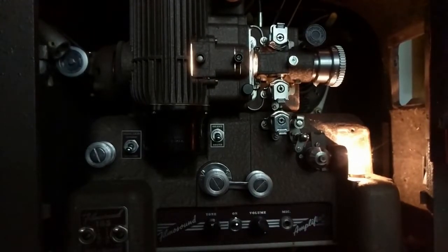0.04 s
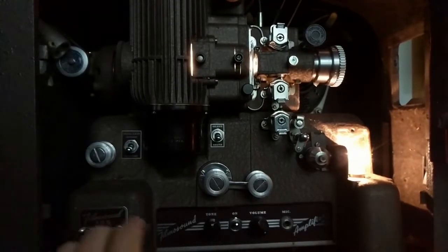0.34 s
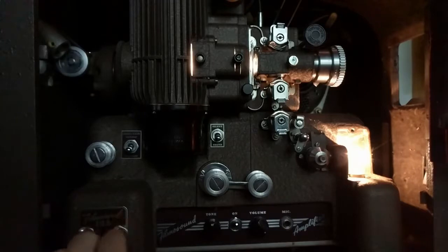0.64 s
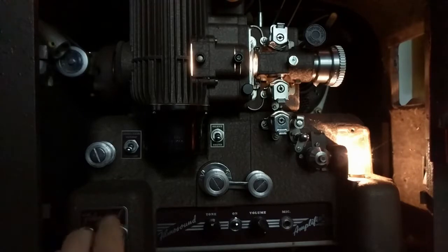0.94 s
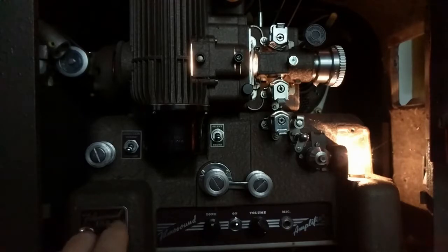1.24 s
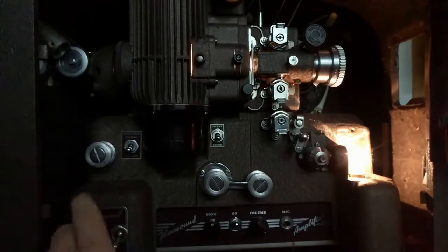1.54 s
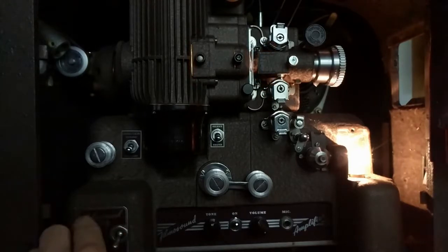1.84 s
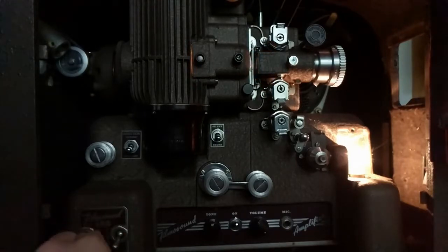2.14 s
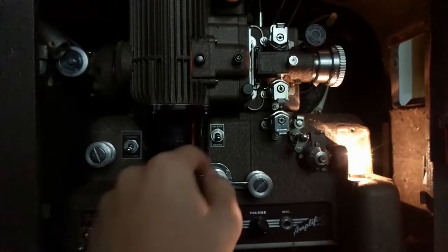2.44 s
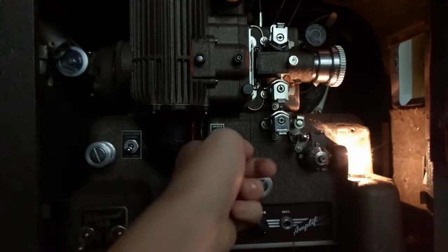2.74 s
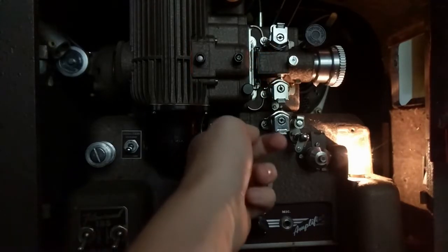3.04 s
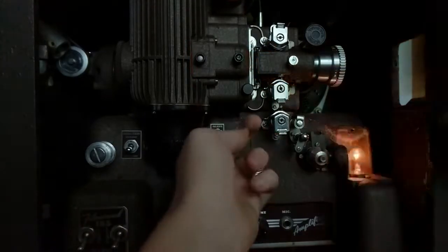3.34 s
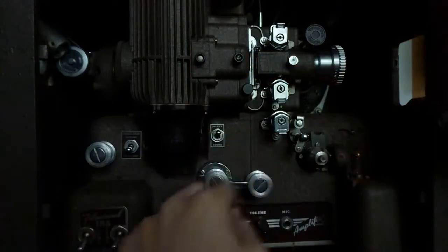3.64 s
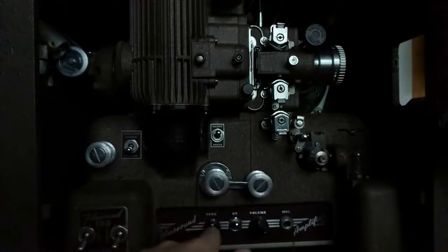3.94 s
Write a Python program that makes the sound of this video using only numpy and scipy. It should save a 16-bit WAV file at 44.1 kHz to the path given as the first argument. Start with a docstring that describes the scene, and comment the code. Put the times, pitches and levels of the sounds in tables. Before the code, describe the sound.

Close up, a film projector whirs and ticks steadily until a loud toggle click sends it coasting to rest. Another switch clicks during the slowdown, then come faint taps, a last click and a soft hand brush in a quiet room.

```python
"""Film projector switching off

A projector runs close by in a quiet room: fan air, whirring gears, motor tones, a ticking film drive.
A toggle snaps and friction brings the mechanism to rest. A second toggle snaps as it coasts; then come
light finger taps, a third toggle and a hand brushing the case. Mains hum remains.
A limiter ducks the mix after each snap."""
import sys
import numpy as np
from scipy import signal
from scipy.fft import rfft, irfft, next_fast_len
from scipy.io import wavfile
from scipy.ndimage import uniform_filter1d, map_coordinates

SR = 44100
rng = np.random.default_rng(int(sys.argv[2]) if len(sys.argv) > 2 else 0)


def unload_audio(sound):
    """Save the sound as a 16-bit wav file, at the path given as the first command line argument."""
    columns = np.transpose(np.atleast_2d(sound))
    # keep every value between -1 and 1, then stretch to whole-number steps
    steps = np.round(np.clip(columns, -1, 1) * 32767)
    wavfile.write(sys.argv[1], SR, steps.astype(np.int16))


N = 176400

COAST_S, STOP_S = 1.433, 2.42
FRAME_HZ, MOTOR_HZ, MAINS_HZ = 22.95, 83.6, 60
TICKS_PER_FRAME = 6

# Room tone: freq_hz, level_db
ROOM_COLOUR = [(25, -22.5), (55, -9.5), (95, 0), (150, -11), (230, -8), (320, -12.5), (550, -14),
               (950, -22), (1400, -15), (2300, -23.5), (3300, -26.5), (11000, -41.5), (15500, -39.5)]
# Mains harmonics, from the fundamental up: level_db
MAINS_LEVELS = [-71.5, -64, -64.5, -73]

# Finger taps on the lever: start_s, level_db, t60_s
FINGER_TAPS = [(2.949, -46.5, 0.08), (2.971, -52, 0.037), (3.005, -48, 0.032), (3.504, -51, .04)]
# Tone of a tap: freq_hz, level_db
TAP_COLOUR = [(200, 3), (800, 0), (2500, 6), (4500, 6), (7000, -8), (16000, -25)]
# Hand strokes on the case: centre_s, half_length_s, level_db
BRUSH_STROKES = [(3.652, 0.037, -47.5), (3.799, .015, -65.5), (3.89, 0.03, -66.5)]
# Skin friction: freq_hz, level_db
BRUSH_COLOUR = [(300, -12.5), (1100, -6), (2200, -12), (3200, -1), (5600, 0), (8000, -9.5), (16000, -18)]
# Resonances under the hand: freq_hz, width_hz, lift_db
BRUSH_PEAKS = [(1090, 80, 12), (1520, 150, 14), (4000, 350, 8.5), (11200, 700, 8), (13700, 620, 6)]

# Swells of the panel drone: centre_s, half_length_s, level_db
DRONE_SWELLS = [(.27, 0.044, -40.5), (.41, 0.038, -43), (.69, 0.0096, -38), (1.04, 0.033, -42),
                (1.17, 0.029, -38.5), (1.995, 0.062, -45), (2.34, 0.049, -49.5)]
# Film drive tones: multiple of the frame rate
DRIVE_MULTIPLES = (3, 8, 57, 63)
# Their strengths: level_db
DRIVE_LEVELS = [-52, -68, -39.5, -43.5]
# Motor tones: multiple of the shaft rate
MOTOR_MULTIPLES = (1, 4, 5, 13, 20, 26)
# Their strengths: level_db
MOTOR_LEVELS = [-47.5, -53.5, -54, -52.5, -63, -62.5]

# Fan air: freq_hz, level_db
AIR_COLOUR = [(100, -36), (300, -13), (600, -2.5), (1000, -2.5), (1500, 0), (2300, -8), (4000, -8),
              (5700, -8.5), (6800, -15), (9500, -16.5), (12000, -11), (14000, -19.5), (16000, -22)]
# Fan housing resonances: freq_hz, width_hz, lift_db
HOUSING_PEAKS = [(1560, 130, -2.5), (1730, 85, 7), (1934, 55, 12), (2017, 35, 9), (2825, 90, 8.5),
                 (2980, 42, 6.5), (3400, 110, 8), (3927, 190, 6.5), (4320, 110, 5.5), (5060, 340, 7),
                 (5560, 217.5, 7.5)]
# Gear whir: freq_hz, level_db
GEAR_COLOUR = [(40, -32), (110, -15.5), (165, -21), (240, -8), (440, -7.5), (560, 0.5), (700, -4),
               (870, -9.5), (1100, 1.5), (1400, -4), (1600, -15), (3000, -10.5), (7000, -23.5),
               (16000, -29)]
# Resonances of the casting: freq_hz, width_hz, lift_db
CASTING_PEAKS = [(347, 19, 7.1), (760.7, 67, 15.3), (1360, 70, 3.5), (2590, 160, 8.3), (3420, 75, 6),
                 (5100, 170, 10)]
# Envelope of a gear resonance that sings as the drive slows: time_s, level_db
SING_ENVELOPE = [(1.36, -40.5), (1.55, -38), (1.72, -32.5), (1.86, -33.5), (1.98, -34.5), (2.06, -40.5),
                 (2.241, -48), (2.4, -99)]
# Last shudders before standstill: centre_s, half_length_s, level_db
SHUDDER_SWELLS = [(2.302, 0.011, -49.5), (2.329, 0.012, -49.5), (2.378, 0.029, -55)]
# Tone of a shudder: freq_hz, level_db
SHUDDER_COLOUR = [(100, -28), (250, 10.5), (700, 6), (1200, -9), (8000, -7.5), (16000, -23)]
# Click of a tick: freq_hz, level_db
TICK_COLOUR = [(1000, -23), (3000, 5), (5300, -14.5), (7000, -5), (9500, -9.5), (11000, 8.5), (12000, 1.5),
               (13200, -9.5), (16000, -17.5)]
# Ring of a tick: pitch_hz, level_db, t60_s
TICK_RING = [(5276, -7.5, 0.029), (10500, -10.5, 0.005), (11560, -5.5, .007), (11900, -6.5, 0.014),
             (12420, -6, .005)]

# Toggle snaps: start_s, crack_db, hold_s, ring_db, clatter_db, body_db, sizzle_db, thump_db,
# lever_db (relative to the crack)
TOGGLE_SNAPS = [(1.3599, -0.5, 0.0055, -27, -18, -4, -23, -47, -45),
                (2.124, 1, 0.003, -20, -23, -7.5, -25.5, -31, -32.5),
                (3.37, -3.5, 0.001, -31, -33, -24.5, -33.5, -69, -36)]
# Crack of the first, second and third toggles: freq_hz, level_db
FIRST_CRACK = [(150, -28), (550, -8), (1050, 1), (1870, -4), (2500, 3), (3280, -6), (4100, 0), (5400, -6),
               (6300, -1), (7000, -13), (15500, -15)]
SECOND_CRACK = [(88, -47), (280, -29), (600, -12.5), (2410, -7), (3410, -10), (3980, 7.5), (4500, -4),
                (5760, -9), (7000, -16.5), (7560, -3.5), (8330, -18), (12300, -8), (13500, -12),
                (15500, -30.5)]
THIRD_CRACK = [(150, -26), (700, -13), (1300, -12.5), (2000, 0.5), (2900, -6.5), (3700, -1.5), (4480, -14),
               (5500, -6.5), (9200, -5.5), (10200, -18), (13000, -7), (16000, -6)]
# Modes of the panels that carry the toggles: pitch_hz, level_db, t60_s
BASE_MODES = [(390, -5, .1), (473, -2.5, 0.15), (647, -2, 0.18), (1049.5, 0.5, 0.1), (1301, 1, .2),
              (1580, -4.5, .07), (1860, 0.5, .17), (2433, -1, 0.13), (2850, -5, .18), (3090, -9, .2),
              (3397, -4.5, .22), (4025, -10.5, .22)]
UPPER_MODES = [(734, 2.5, 0.09), (1330, -1.5, 0.1), (1810, -0.5, 0.13), (3260, -10.5, 0.26),
               (4200, -8, 0.2), (5730, -8, 0.21), (9300, -5, .2)]
# Body knock, diffuse clatter and spring sizzle of a snap: freq_hz, level_db
BODY_COLOUR = [(40, -25), (150, -14), (400, -11.5), (700, 3.5), (3000, 3.5), (5000, -20), (12000, -35.5)]
CLATTER_COLOUR = [(100, -7), (600, -1), (1500, -9), (3800, 1.5), (6000, -3), (9000, -7.5), (16000, -13)]
SPRING_COLOUR = [(3000, -25.5), (7000, -1.5), (11000, -5.5), (14000, -3.5), (16000, -13)]


def amp(db):
    """Decibels to gain."""
    return 10 ** (np.asarray(db) / 20)


def unit(x):
    """Scale to rms 1."""
    return x / np.sqrt(np.mean(x ** 2) + 1e-20)


def clock():
    """Time of each sample in seconds."""
    return np.arange(N) / SR


def wobble(rate_hz):
    """A smooth random curve with rate_hz knots a second."""
    return map_coordinates(rng.standard_normal(int(N * rate_hz / SR) + 4), [clock() * rate_hz])


def shaped_noise(response):
    """Noise of rms 1 through a gain curve over frequency."""
    size = next_fast_len(N + 8192)
    spectrum = rfft(rng.standard_normal(N), size) * response(np.fft.rfftfreq(size, 1 / SR))
    return unit(irfft(spectrum, size)[:N])


def noise(colour, peaks=()):
    """Noise of rms 1 with a broad colour and resonances on top."""
    freqs, levels = np.transpose(colour)

    def response(hz):
        broad_db = np.interp(np.log(hz + 1), np.log(freqs + 1), levels)
        lift_db = sum(db / (1 + (2 * (hz - centre) / width) ** 2) for centre, width, db in peaks)
        return amp(broad_db + lift_db)
    return shaped_noise(response)


def narrow(centre_hz, width_hz):
    """Noise of rms 1 in a single resonance."""
    return shaped_noise(lambda hz: 1 / (1 + (2 * (hz - centre_hz) / width_hz) ** 4))


def strike(start_s, t60_s, hold_s=0):
    """Sudden attack, hold, exponential release."""
    age = clock() - start_s
    return (age >= 0) * amp(-60 * np.maximum(age - hold_s, 0) / t60_s)


def swells(rows):
    """Sum of bell-shaped swells."""
    return sum(amp(db) * np.exp(-((clock() - centre) / half) ** 2) for centre, half, db in rows)


def sine(cycles):
    """A tone of rms 1 with a random starting phase."""
    return np.sqrt(2) * np.sin(2 * np.pi * (cycles + rng.random()))


def room():
    """The bed: room rumble and hiss, mains hum and a faint, steady, very high narrow hiss."""
    hum = sum(amp(db) * sine(k * MAINS_HZ * clock()) for k, db in enumerate(MAINS_LEVELS, 1))
    return amp(-61) * noise(ROOM_COLOUR) + hum + amp(-91.5) * narrow(14460, width_hz=160)


def hand(grain_db=2, touch_s=0.038):
    """Light finger taps, and grainy brushes that start as the skin lands, touch_s before mid-stroke."""
    taps = sum(amp(db) * strike(start, t60) for start, db, t60 in FINGER_TAPS) * noise(TAP_COLOUR)
    strokes = sum(swells([row]) * (clock() > row[0] - touch_s) for row in BRUSH_STROKES)
    return taps + strokes * amp(grain_db * wobble(310)) * noise(BRUSH_COLOUR, BRUSH_PEAKS)


def panel_drone(speed, pitch_hz=215.8, drift_hz=5):
    """A case panel drones in uneven swells over a low murmur that fades with the speed."""
    phase = 2 * np.pi * np.cumsum(pitch_hz + drift_hz * wobble(25.33)) / SR
    murmur = amp(-52) * speed * narrow(pitch_hz, width_hz=39)
    return swells(DRONE_SWELLS) * np.sqrt(2) * np.sin(phase) + murmur


def shaft_tones(speed, flutter=.0012, waver_db=2, case_hz=134, case_width_hz=24, case_lift_db=16):
    """Drive and motor tones glide down with the speed; the falling hum sweeps a case resonance."""
    travel_s = np.cumsum(speed * (1 + flutter * wobble(14))) / SR
    partials = [(k * FRAME_HZ, db) for k, db in zip(DRIVE_MULTIPLES, DRIVE_LEVELS)]
    partials += [(k * MOTOR_HZ, db) for k, db in zip(MOTOR_MULTIPLES, MOTOR_LEVELS)]
    out = np.zeros(N)
    for hz, db in partials:
        if hz < 10 * FRAME_HZ:  # hum lasts until it sinks too low to radiate
            pitch_hz = hz * speed
            radiation = 1 / (1 + (58 / (pitch_hz + 1)) ** 20)
            resonance = np.exp(-(2 * (pitch_hz - case_hz) / case_width_hz) ** 2 / 2)
            gain = speed ** .3 * radiation * amp(case_lift_db * resonance)
        else:  # whines fade fast once the load is off
            gain = speed ** 5 * amp(waver_db * wobble(16))
        out += amp(db) * gain * sine(hz * travel_s)
    return out


def fan(speed):
    """Air rushes through the resonant housing and dies away as the fan slows."""
    return amp(-30) * speed ** 1.78 * noise(AIR_COLOUR, HOUSING_PEAKS)


def gears(speed, pulse_depth=0.033, rough_db=1.5):
    """Gears whir in the casting, pulsing with the frames; they sing as they slow and shudder to rest."""
    frames = np.cumsum(speed) / SR * FRAME_HZ
    pulse = 1 + pulse_depth * np.cos(2 * np.pi * frames)
    whir = amp(-31.5 + rough_db * wobble(70)) * speed ** 0.93 * pulse * noise(GEAR_COLOUR, CASTING_PEAKS)
    sing_db = np.interp(clock(), *np.transpose(SING_ENVELOPE), left=-120, right=-120)
    sing = amp(sing_db) * narrow(1340, width_hz=190)
    return whir + sing + swells(SHUDDER_SWELLS) * noise(SHUDDER_COLOUR)


def film_ticks(speed, claw_db=7, backlash_db=3, tint_db=2.5, quiet_speed=0.31):
    """Six uneven ticks a frame, the first accented; they spread and wander as the teeth run slack."""
    count = np.floor(np.cumsum(speed) / SR * FRAME_HZ * TICKS_PER_FRAME).astype(int)
    due = np.flatnonzero(np.diff(count))
    strength, lateness, *tints = rng.standard_normal((1000, 2 + len(TICK_RING)))[count[due]].T
    load = speed ** 5
    jitter_s = .00025 * lateness / np.maximum(speed[due], .3) ** 1.5
    starts = np.abs(due + jitter_s * SR).astype(int)
    accent = (count[due] % TICKS_PER_FRAME == 0) * load[due]
    hit_db = claw_db * accent + 1.7 * (2 - speed[due]) * np.minimum(strength, 1)

    def each_tick(shape, tint=0):
        hits = np.bincount(starts, amp(hit_db + tint_db * np.clip(tint, -1, 1)), N)
        return signal.fftconvolve(hits, shape[:SR // 10])[:N]

    def unit_running(x):  # rms 1 over the first second, at full speed
        return x / np.sqrt(np.mean(x[:SR] ** 2))

    attack = 1 - np.exp(-clock() / .0005)
    modes = np.zeros(N)
    for (hz, db, t60), tint in zip(TICK_RING, tints):  # every tick has its own balance of modes
        mode = amp(db) * attack * strike(0, t60) * np.sin(2 * np.pi * hz * clock())
        modes += each_tick(mode, tint)
    ring = amp(-43 + backlash_db * (1 - load)) * unit_running(modes)
    clicks = amp(-41) * unit_running(each_tick(strike(0, t60_s=.013))) * noise(TICK_COLOUR)
    force = speed ** 0.38 / (1 + (quiet_speed / (speed + 1e-3)) ** 4)  # slow teeth mesh silently
    return force * (clicks + ring)


def panel_ring(start_s, modes):
    """A struck panel rings in its modes, with a rattle in their phase."""
    out, age = np.zeros(N), clock() - start_s
    for hz, db, t60 in modes:
        rattle = (.35 + hz / 6000) * wobble(130)
        out += amp(db) * strike(start_s, t60) * np.sin(2 * np.pi * hz * age + rattle)
    return out


def switches(lead_s=0.003, crack_t60_s=.019, echo_s=0.014, thump_hz=67):
    """Each toggle tips over, cracks, knocks the body and leaves its spring and panel ringing."""
    out, t = np.zeros(N), clock()
    body, clatter, spring = noise(BODY_COLOUR), noise(CLATTER_COLOUR), noise(SPRING_COLOUR)
    toggles = [(FIRST_CRACK, BASE_MODES), (SECOND_CRACK, BASE_MODES), (THIRD_CRACK, UPPER_MODES)]
    for snap, (colour, modes) in zip(TOGGLE_SNAPS, toggles):
        start, crack_db, hold_s, ring_db, clatter_db, body_db, sizzle_db, thump_db, lever_db = snap
        lever = amp(lever_db) * strike(start - lead_s, crack_t60_s, lead_s)
        out += amp(crack_db) * (lever + strike(start, crack_t60_s, hold_s)) * noise(colour)
        contact = amp(crack_db - 5) * strike(start, t60_s=.014)  # bright metal on metal
        echo = amp(crack_db - 30) * strike(start + echo_s, t60_s=.06)  # off a nearby surface
        sizzle = amp(sizzle_db) * strike(start, t60_s=.1)
        out += (contact + echo + sizzle) * spring
        out += amp(body_db) * strike(start, t60_s=.088) * body
        out += amp(clatter_db) * strike(start, t60_s=.27) * clatter
        out += amp(thump_db) * strike(start, t60_s=.1) * np.sin(2 * np.pi * thump_hz * (t - start))
        out += amp(ring_db) * panel_ring(start, modes)
    return out


def scene():
    """The mono mix; friction slows the whole mechanism evenly from full speed (1) to rest (0)."""
    speed = np.clip((STOP_S - clock()) / (STOP_S - COAST_S), 0, 1)
    projector = panel_drone(speed) + shaft_tones(speed) + fan(speed) + gears(speed) + film_ticks(speed)
    return (room() + hand() + projector + switches())[None]


def record(dry, ceiling_db=-11, release_db_per_s=85, top_hz=15750):
    """A fast limiter with slow recovery, then soft clipping and a steep high cut."""
    mix = dry[0]
    level_db = 10 * np.log10(np.abs(uniform_filter1d(mix ** 2, size=88)) + 1e-12)
    over_db = np.maximum(level_db - ceiling_db, 0)
    recovery_db = release_db_per_s * clock()
    duck_db = np.maximum.accumulate(over_db + recovery_db) - recovery_db
    limited = mix * amp(-duck_db)
    clipped = limited / (1 + (limited / .9) ** 4) ** (1 / 4)
    high_cut = signal.ellip(10, .1, 80, top_hz, fs=SR, output="sos")
    return signal.sosfilt(high_cut, clipped)[None]


dry = scene()
out = record(dry)
unload_audio(out)
```